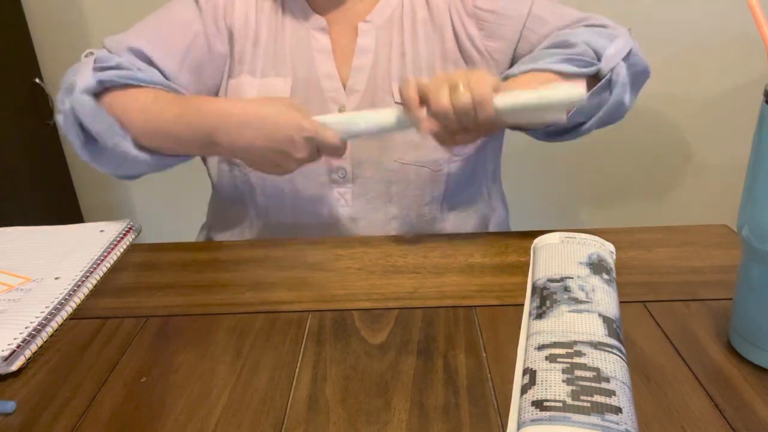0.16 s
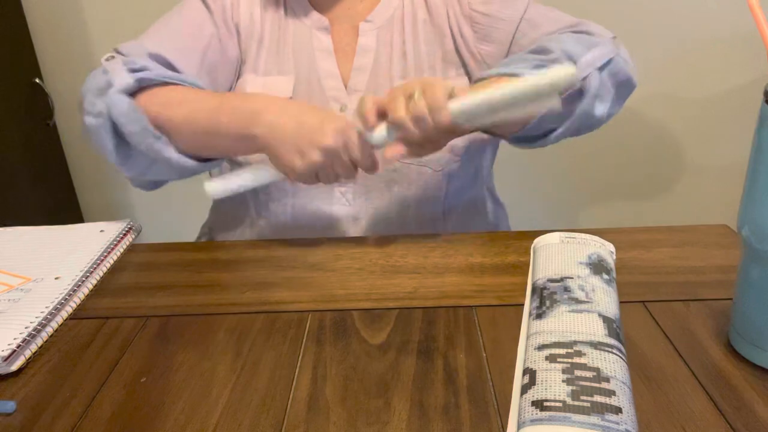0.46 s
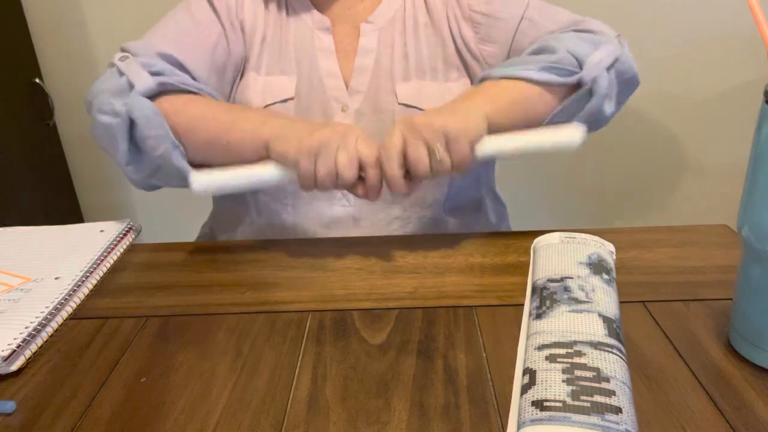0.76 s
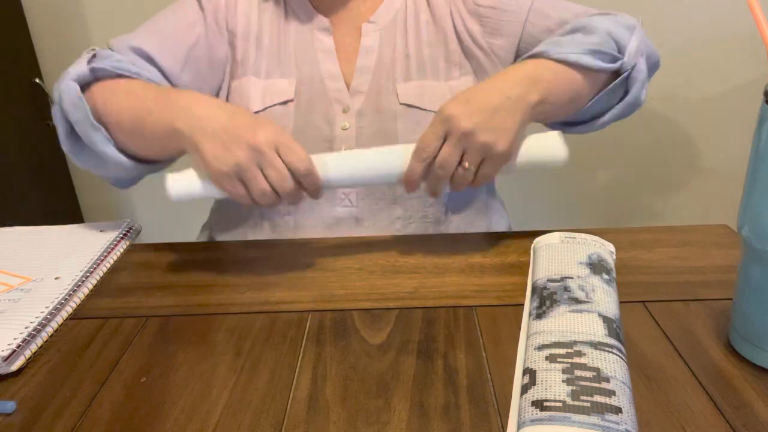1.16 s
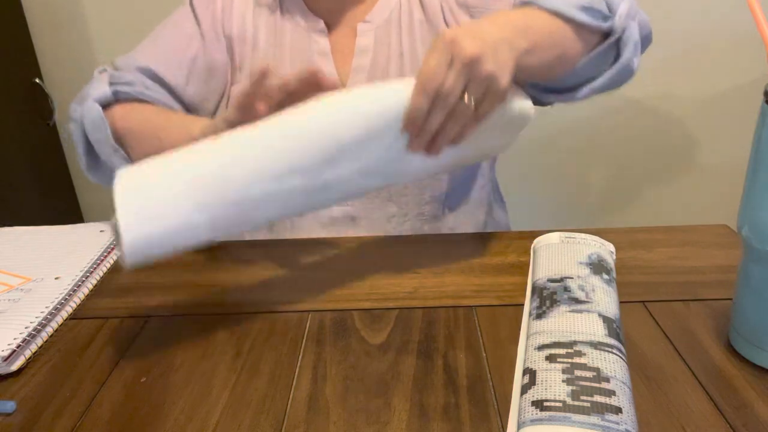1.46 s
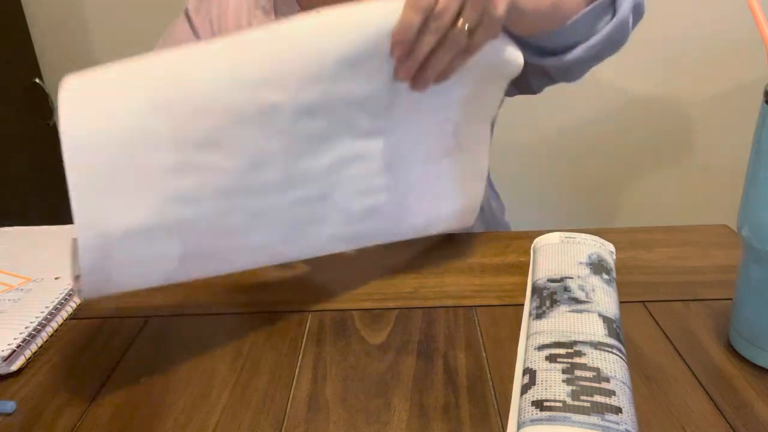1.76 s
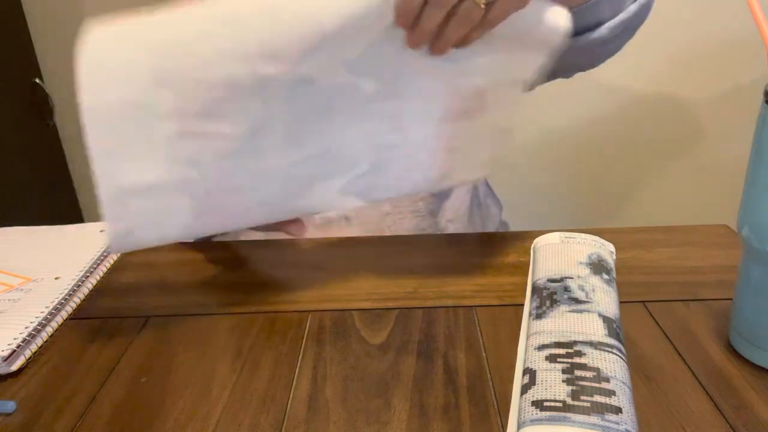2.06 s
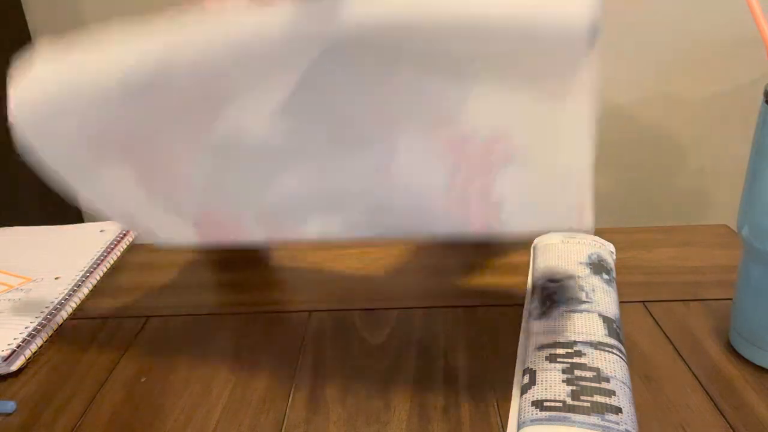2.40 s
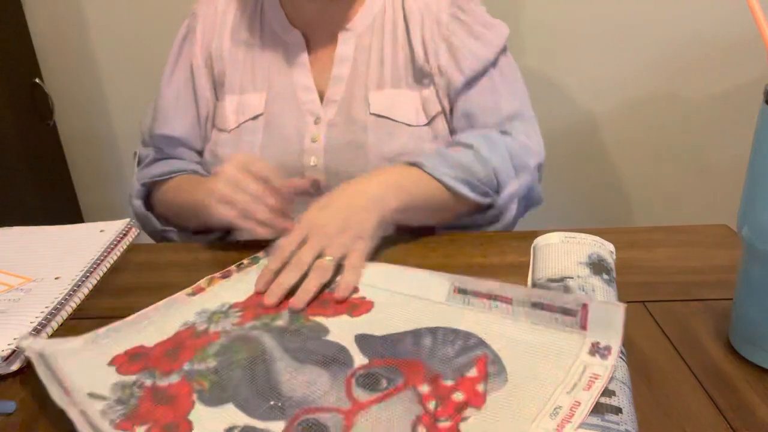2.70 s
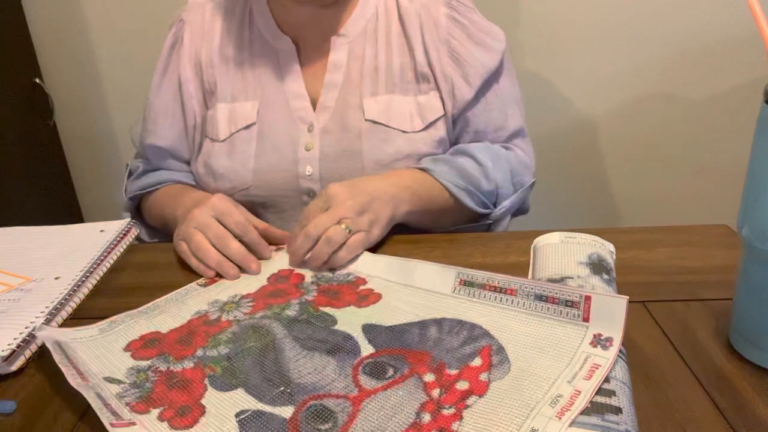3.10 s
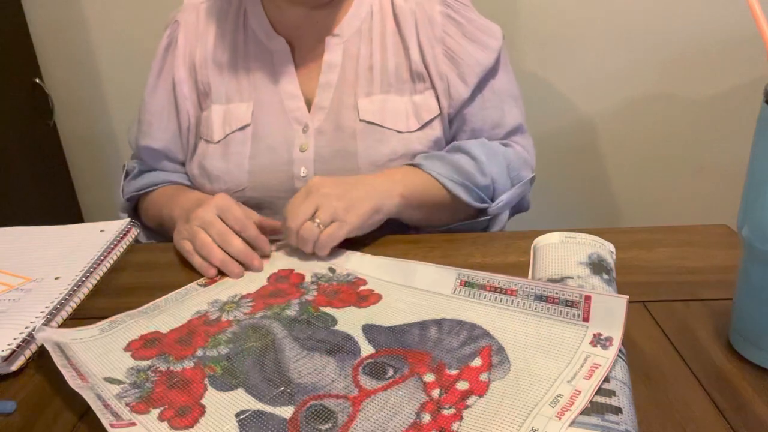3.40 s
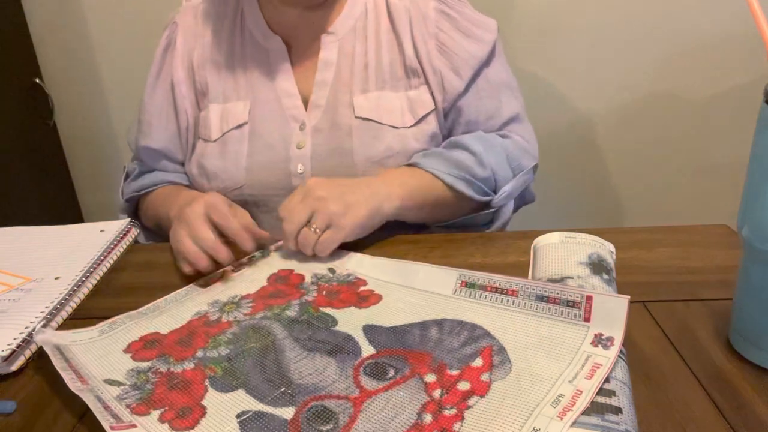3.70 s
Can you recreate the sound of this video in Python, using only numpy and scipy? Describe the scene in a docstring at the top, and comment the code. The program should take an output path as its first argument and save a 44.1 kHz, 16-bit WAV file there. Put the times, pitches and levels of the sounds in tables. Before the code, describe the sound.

Stiff canvas crinkling as hands unroll it, flap it onto a table and pick at it.

```python
"""Unrolling a stiff canvas.

Hands twist and unroll a canvas with a plastic film, flap it onto a wooden table and pick at its corner.
Dense tiny slips make the rustle; the hollow roll rings under it until the sheet lies flat.
Creases snap, the swinging sheet puffs air, landings ring the table. Quiet room, two-port microphone."""
import sys
import numpy as np
from scipy import signal
from scipy.fft import rfft, irfft
from scipy.io import wavfile
from scipy.ndimage import uniform_filter1d

SR = 44100
rng = np.random.default_rng(int(sys.argv[2]) if len(sys.argv) > 2 else 0)


def unload_wav(signal):
    """Save mono or channel-first audio to the path in sys.argv[1] as 16-bit WAV at rate SR, clipped to [-1, 1]."""
    wavfile.write(
        sys.argv[1],
        SR,
        np.round(np.clip(np.atleast_2d(signal).T, -1, 1) * 32767).astype(np.int16),
    )


N = 169785
TIME_S = np.arange(N) / SR
BINS_HZ = np.fft.rfftfreq(N, 1 / SR)


def amp(db):
    return 10 ** (np.asarray(db) / 20)


def unit_rms(x):
    return x / np.sqrt(np.mean(x ** 2) + 1e-20)


def ramp(start_s, length_s):
    return np.clip((TIME_S - start_s) / length_s, 0, 1)


def curve_at(points, hz):
    """Table value, interpolated over log frequency."""
    points_hz, values = np.transpose(points)
    return np.interp(np.log(hz + 1), np.log(points_hz + 1), values)


def envelope(table, column=1):
    """Gain over time from one dB column."""
    rows = np.array(table)
    return amp(np.interp(TIME_S, rows[:, 0], rows[:, column]))


def band_taps(spectrum):
    """Minimum-phase filter of unit energy."""
    hz = np.abs(np.fft.fftfreq(4096, 1 / SR))
    points_hz, db = np.transpose(spectrum)
    log_gain = np.log(amp(np.interp(np.log(hz + 1), np.log(points_hz), db, left=-70, right=-70)))
    phase = -signal.hilbert(log_gain).imag
    taps = np.fft.ifft(np.exp(log_gain + 1j * phase)).real[:2048]
    return taps / np.linalg.norm(taps)


def shaped(x, spectrum):
    return unit_rms(signal.oaconvolve(x, band_taps(spectrum))[:N])


def resonate(x, hz, width_hz):
    carrier = np.exp(2j * np.pi * hz * TIME_S)
    pole = np.exp(-np.pi * width_hz / SR)
    return 2 * (carrier * signal.lfilter([1 - pole], [1, -pole], x / carrier)).real


# hush spectrum: f/Hz, relative level/dB
HUSH_SPECTRUM = [(15, -46), (25, 0), (124, 10), (524, -5), (1220, -1.5), (2400, -9.5), (4480, -16),
                 (8370, -22), (13600, -4.5), (16500, -30)]
def room_hush(level_db=-67):
    """Steady room noise, partly shared by both sides."""
    shared, left, right = rng.standard_normal((3, N))
    noise = np.array([shared + 1.46 * left, shared + 2.03 * right])
    hush = irfft(rfft(noise) * amp(curve_at(HUSH_SPECTRUM, BINS_HZ)), N)
    return amp(level_db) * unit_rms(hush)


# room decay: f/Hz, T60/s
ROOM_T60 = [(200, 0.28), (5000, 0.081), (14000, 0.071)]
# reverb against direct sound: f/Hz, level/dB
ROOM_WET = [(250, -7), (4000, -4), (12000, -5)]
def room_reverb(x, gap=20):
    """Sparse reflections of random sign, separate per side; each band dies at its own rate."""
    taps = np.zeros((2, SR // 2))
    slots = np.arange(120, SR // 2 - gap, gap)
    arrivals = slots + rng.integers(0, gap, (2, len(slots)))
    np.put_along_axis(taps, arrivals, rng.choice([-1., 1.], arrivals.shape), 1)
    hz, t, spectra = signal.stft(taps, SR, nperseg=256)
    decay = amp(-60 * t / curve_at(ROOM_T60, hz)[:, None])
    decay *= (amp(curve_at(ROOM_WET, hz)) / np.linalg.norm(decay, axis=1))[:, None]
    tail = signal.istft(spectra * decay, SR, nperseg=256)[1] * np.sqrt(gap / 128)
    return signal.fftconvolve(x[None], tail, axes=1)[:, :N]


# left port ahead of right: f/Hz, phase/rad
PORT_LEAD = [(100, -.1), (800, -.4), (2800, -.8), (4300, .1), (5800, -2.2), (7700, -2.9), (9300, -1.2),
             (11000, -.1), (13700, .3), (15500, 1.6)]
def mic_ports(x):
    """Direct sound reaches the two ports with a phase lead between them."""
    half_lead = np.exp(.5j * curve_at(PORT_LEAD, BINS_HZ))
    return irfft(rfft(x) * np.array([half_lead, 1 / half_lead]), N)


# sheet edges against its middle: f/Hz, level/dB
EDGE_GAIN = [(100, -14), (300, -7.5), (1000, -18), (4000, -2.5), (12000, -29.5)]
def far_edges(x):
    """Sound from the sheet's far edges reaches the ports in opposite polarity."""
    side = irfft(rfft(x) * amp(curve_at(EDGE_GAIN, BINS_HZ)), N)
    return np.array([side, -side])


# puff envelope: t/s, level/dB
PUFFS = [(1.55, -67), (1.66, -67.5), (1.885, -86), (1.91, -61), (1.945, -53), (2.02, -95), (2.062, -49.5),
         (2.18, -70), (2.31, -58), (2.43, -77), (2.47, -45), (2.55, -61), (2.68, -47.5), (2.74, -73),
         (2.81, -56.5), (2.86, -58), (2.92, -84.5), (3.22, -64), (3.3, -77), (3.85, -66.5)]
# puff spectrum: f/Hz, relative level/dB
PUFF_SPECTRUM = [(20, -15), (45, -3.5), (80, 0.5), (135, -7), (200, -10), (330, -18)]
def air_puffs():
    """The swinging sheet pushes air in low, lumpy puffs."""
    fade_in = ramp(PUFFS[0][0], length_s=.04)
    return fade_in * envelope(PUFFS) * shaped(rng.standard_normal(N), PUFF_SPECTRUM)


# sheet or fingers landing: t/s, level/dB
LANDINGS = [(2.053, -46.5), (2.4631, -25.5), (3.193, -45), (3.8128, -32.5)]
# table top modes: f/Hz, gain/dB, T60/s
TABLE_MODES = [(465, 7, 0.021), (980, 2.5, 0.015)]
def table_knocks(rise_s=.001):
    """Each landing rings the wooden top briefly."""
    out = np.zeros(N)
    for start_s, knock_db in LANDINGS:
        t = np.maximum(TIME_S - start_s, 0)
        attack = 1 - np.exp(-t / rise_s)
        for hz, mode_db, t60_s in TABLE_MODES:
            out += attack * amp(knock_db + mode_db - 60 * t / t60_s) * np.sin(2 * np.pi * hz * t)
    return out


# snaps, energy as 1 ms at each level: t/s, treble/dB, middle/dB, low/dB
CREASE_SNAPS = [(0.0262, -37.5, -46.0, -59.5), (0.0772, -34.0, -37.5, -51.0), (0.0881, -28.0, -38.5, -47.0),
                (0.1799, -32.5, -39.0, -53.0), (0.228, -39.5, -43.5, -59.5), (0.302, -40.0, -45.5, -48.5),
                (0.6793, -48.0, -50.5, -63.5), (0.7146, -42.0, -55.0, -63.5), (0.8126, -33.0, -37.0, -45.0),
                (1.3653, -47.0, -39.5, -33.5), (1.8354, -43.0, -53.5, -61.0), (2.4025, -40.5, -47.0, -53.5),
                (2.4405, -47.5, -38.5, -43.5), (2.5402, -40.5, -36.0, -38.0), (2.6176, -40.0, -46.0, -40.5),
                (2.7006, -44.5, -52.0, -56.5), (2.7134, -48.0, -46.5, -40.0), (2.7297, -36.5, -45.0, -59.0),
                (2.8426, -44.0, -54.5, -66.0), (2.8851, -44.0, -54.0, -69.5), (2.8981, -44.0, -63.0, -69.5),
                (2.9392, -49.5, -45.5, -47.5), (3.0559, -46.5, -50.0, -68.5), (3.1258, -46.5, -49.5, -53.5),
                (3.1407, -34.0, -37.0, -50.0), (3.1516, -37.0, -41.0, -53.0), (3.1762, -22.5, -38.0, -45.0),
                (3.1817, -27.5, -40.5, -48.5), (3.2037, -24.5, -27.5, -37.0), (3.207, -24.0, -31.0, -40.5),
                (3.3108, -44.0, -41.0, -67.5), (3.33, -38.5, -37.5, -48.0), (3.3369, -26.0, -37.5, -44.5),
                (3.3449, -35.0, -48.5, -52.5), (3.3565, -39.5, -45.0, -50.0), (3.419, -32.0, -36.5, -47.0),
                (3.4487, -45.5, -45.0, -56.5), (3.5414, -54.0, -47.5, -59.0), (3.6027, -35.0, -40.5, -62.0),
                (3.6127, -40.5, -44.5, -53.0), (3.6341, -43.5, -42.0, -39.5), (3.6385, -42.5, -44.0, -45.5),
                (3.6699, -48.0, -43.0, -40.0), (3.6972, -40.0, -41.5, -36.5), (3.713, -27.0, -25.0, -38.0),
                (3.7327, -31.0, -32.5, -32.0), (3.7391, -19.0, -27.0, -35.0), (3.7507, -25.5, -27.5, -36.0),
                (3.7591, -28.5, -30.0, -37.5), (3.7623, -30.5, -30.0, -41.0), (3.7666, -28.5, -32.5, -44.5),
                (3.7741, -26.5, -30.0, -46.0), (3.7811, -29.5, -29.5, -39.0), (3.7893, -29.0, -28.5, -40.0),
                (3.7962, -30.5, -32.0, -35.5), (3.8109, -17.0, -14.0, -25.0), (3.8164, -25.5, -30.5, -46.5),
                (3.8275, -28.0, -28.5, -46.5), (3.8374, -33.5, -32.0, -43.0)]
# band spectra, treble shared with the rustle: f/Hz, relative level/dB
TREBLE_BAND = [(5600, -75), (7500, -0.5), (10100, -0.5), (14300, 2), (16000, -5.5), (16500, -67)]
SNAP_MIDDLE_BAND = [(1500, -25), (2100, -2), (2950, -7), (4000, 4), (5000, 0), (5900, 4), (7500, -7),
                    (9500, -18)]
SNAP_LOW_BAND = [(400, -6), (650, 2), (1100, 2), (1900, 2), (2600, -30)]
# treble, middle, low: T60/s
SNAP_DECAYS_S = [0.0042, 0.0045, 0.018]
def crease_snaps(rise_s=.0001):
    """Each crease gives a sharp noise burst; the low band rings longest."""
    out = np.zeros(N + 4096)
    t = np.arange(2048) / SR
    bursts = rng.standard_normal((len(CREASE_SNAPS), len(t))) * (1 - np.exp(-t / rise_s))
    filters = [band_taps(band) for band in (TREBLE_BAND, SNAP_MIDDLE_BAND, SNAP_LOW_BAND)]
    for (start_s, *levels_db), burst in zip(CREASE_SNAPS, bursts):
        for db, taps, t60_s in zip(levels_db, filters, SNAP_DECAYS_S):
            snap = signal.fftconvolve(burst * amp(-60 * t / t60_s), taps)
            snap *= np.sqrt(SR / 1000) / np.linalg.norm(snap)
            out[round(start_s * SR):][:len(snap)] += amp(db) * snap
    return out[:N]


def slips(per_s, spread_db, hiss, t60_s=.0031, shapes=12):
    """Tiny uneven slips of the coated surface over a hiss."""
    decay = amp(-60 * np.arange(400) / SR / t60_s)
    sizes = amp(spread_db * np.minimum(rng.exponential(1, N), 4))
    impulses = sizes * (rng.random(N) < per_s / SR)
    shape_ids = rng.integers(0, shapes, N)
    ticks = np.zeros(N)
    for shape in range(shapes):
        tick = rng.standard_normal(len(decay)) * decay
        ticks += signal.oaconvolve(impulses * (shape_ids == shape), tick)[:N]
    return (1 - hiss) * unit_rms(ticks) + hiss * rng.standard_normal(N)


def moving_folds(x, depth_db=1.5):
    """Broad patches of the spectrum swell and sink as the folds move."""
    spectra = signal.stft(x, nperseg=256)[2]
    patches = rng.standard_normal(spectra.shape[::-1]).T
    patches = uniform_filter1d(patches, size=24, axis=0)
    patches = unit_rms(uniform_filter1d(patches, size=6, axis=1))
    return signal.istft(spectra * amp(depth_db * patches), nperseg=256)[1][:N]


# sheet hanging free, then under the fingers: start/s, end/s
CRACKLE_SPANS = [(1.64, 1.89), (2.8, 3.85)]
def friction():
    """Dense slips under sliding palms; sparser, more uneven ones while the sheet only crackles."""
    crackling = sum((TIME_S > start_s) & (TIME_S < end_s) for start_s, end_s in CRACKLE_SPANS)
    crackle = slips(per_s=400, spread_db=5, hiss=.3)
    slide = slips(per_s=2000, spread_db=3, hiss=.47)
    return moving_folds(np.where(crackling, crackle, slide))


def air_column(drive, modes):
    """Slips ring the air in the roll, two resonators in series per mode."""
    rings = (amp(db) * resonate(resonate(drive, hz, width_hz), hz, width_hz)
             for hz, width_hz, db in modes)
    return unit_rms(sum(rings))


# sheet body spectrum: f/Hz, relative level/dB
BODY_BAND = [(130, -19), (260, -1), (480, 1), (950, -1), (1400, -25)]
# air column modes, tight and sprung open: f/Hz, width/Hz, relative level/dB
TIGHT_MODES = [(388, 100, 0)]
LOOSE_MODES = [(483.4, 36, 8.5), (859, 28, 1), (1252, 21, -1), (1652, 106, -1.5), (1910, 250, -0.5)]
def sheet_body(drive, opens_s=1.26, flat_s=1.43, change_s=.03, cutoff_hz=290, loose_db=8):
    """Rolled, the sheet lacks bass and rings as a tube; it springs open, then lies flat."""
    opened, flat = ramp(opens_s, change_s), ramp(flat_s, change_s)
    tight, loose = 1 - opened, opened - flat
    flat_sheet = shaped(drive, BODY_BAND)
    rolled_sheet = signal.sosfilt(signal.butter(4, cutoff_hz, "high", fs=SR, output="sos"), flat_sheet)
    body = flat * flat_sheet + (1 - flat) * rolled_sheet
    body += tight * air_column(drive, TIGHT_MODES)
    body += loose * amp(loose_db) * air_column(drive, LOOSE_MODES)
    power = 1 + tight + loose * amp(loose_db) ** 2
    return body / np.sqrt(power)


# unrolling, then picking: t/s, treble/dB, upper middle/dB, lower middle/dB, body/dB
UNROLL_STROKES = [(0, -55, -54.5, -64.5, -65), (0.06, -40.5, -45, -57.5, -57),
                  (0.17, -47.5, -52, -59.5, -53.5), (0.21, -57, -59, -65, -67),
                  (0.27, -53.5, -54.5, -69, -60.5), (0.32, -46.5, -49.5, -59, -54),
                  (0.45, -48.5, -53, -64.5, -64.5), (0.55, -43, -46, -57.5, -50.5),
                  (0.62, -47, -49.5, -56.5, -50), (0.675, -63, -62.5, -71.5, -72),
                  (0.72, -48, -54, -62.5, -64), (0.79, -43.5, -48.5, -57, -51.5),
                  (0.86, -50, -54.5, -62.5, -52.5), (1.0, -51, -53, -56.5, -55.5),
                  (1.1, -56, -55.5, -61.5, -61), (1.28, -53.5, -54.5, -57.5, -57),
                  (1.31, -47.5, -45, -50.5, -46), (1.37, -44.5, -46, -51.5, -40.5),
                  (1.395, -49.5, -51, -65, -57), (1.44, -47.5, -53.5, -55, -51),
                  (1.49, -44.5, -48.5, -55, -50.5), (1.53, -45, -51.5, -57, -57),
                  (1.58, -52, -56, -59.5, -64.5), (1.618, -50, -51, -50.5, -52),
                  (1.65, -56.5, -58, -61, -67), (1.8, -63, -67, -66.5, -75.5),
                  (1.835, -55.5, -66, -59, -75), (1.89, -65, -70, -72, -76), (1.925, -57, -56.5, -57, -56),
                  (1.97, -60, -64.5, -65, -68.5), (2.03, -65, -68, -76, -99),
                  (2.06, -54.5, -56, -56, -53.5), (2.13, -53, -51, -51.5, -57),
                  (2.19, -58.5, -57.5, -57.5, -51), (2.24, -47, -50, -52, -48.5),
                  (2.32, -49, -50, -52, -52.5), (2.36, -57, -60, -64, -59.5), (2.43, -63.5, -61, -59, -69),
                  (2.455, -38.5, -40.5, -45.5, -52), (2.49, -50, -48.5, -56, -51.5),
                  (2.55, -44.5, -53.5, -53.5, -57), (2.66, -50.5, -47.5, -54.5, -54.5),
                  (2.69, -65, -63, -70, -77), (2.73, -48.5, -51, -60, -65.5),
                  (2.845, -58.5, -61.5, -70, -85), (2.87, -66, -70, -94, -104)]
PICK_STROKES = [(2.89, -76, -70.5, -83, -105), (3.11, -70, -70, -77, -85), (3.21, -47, -54, -58, -53.5),
                (3.28, -58, -62, -77, -86), (3.59, -66, -69.5, -85, -74.5), (3.776, -40, -43, -50, -49.5),
                (3.85, -41, -42, -47, -49.5)]
# band spectra: f/Hz, relative level/dB
UPPER_MIDDLE_BAND = [(2200, -59), (3000, -5.5), (4200, -7.5), (5800, -3.5), (7500, -2), (9500, -42.5)]
LOWER_MIDDLE_BAND = [(800, -26), (1150, 9), (2000, 5.5), (2700, 6.5), (3500, -49)]
def rustle():
    """Slips drive four bands, each swelling with the hand strokes."""
    drive = friction()
    strokes = list(UNROLL_STROKES) + list(PICK_STROKES)
    bands = [shaped(drive, band) for band in (TREBLE_BAND, UPPER_MIDDLE_BAND, LOWER_MIDDLE_BAND)]
    bands.append(sheet_body(drive))
    return sum(envelope(strokes, column) * band for column, band in enumerate(bands, start=1))


def scene():
    """Canvas and table in the centre, independent edge sound for width, the room around them."""
    centre = rustle() + air_puffs() + crease_snaps() + table_knocks()
    edges = rustle() + air_puffs() + amp(-8) * crease_snaps()
    return mic_ports(centre) + far_edges(edges) + room_reverb(centre) + room_hush()


def record(dry):
    """Steep low-pass band limit."""
    cutoff_hz = 16300
    taps = signal.firwin(511, cutoff_hz, window=("kaiser", 9), fs=SR)
    return signal.oaconvolve(dry, taps[None], "same")


dry = scene()
out = record(dry)
unload_wav(out)
```